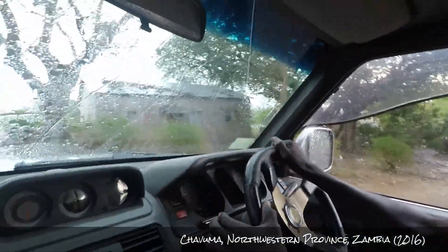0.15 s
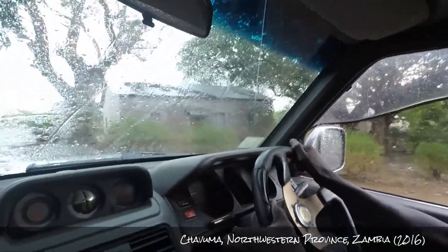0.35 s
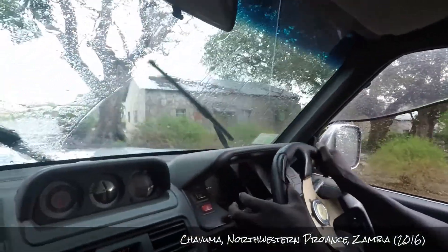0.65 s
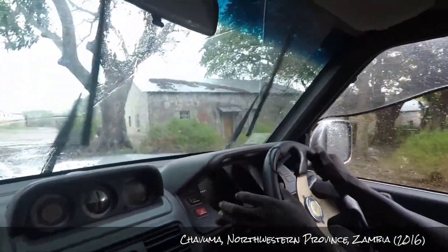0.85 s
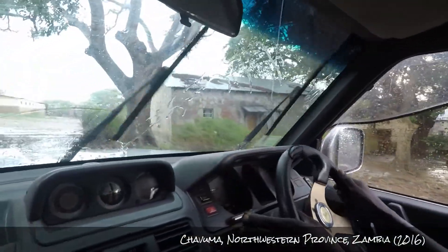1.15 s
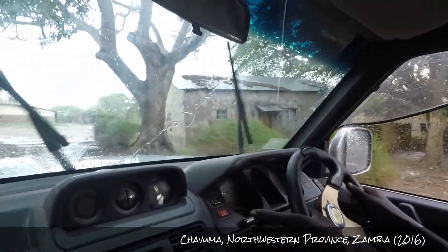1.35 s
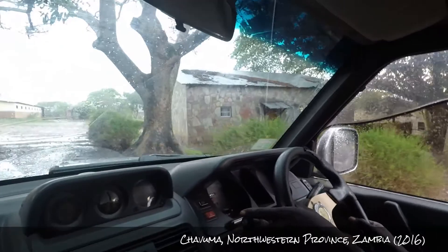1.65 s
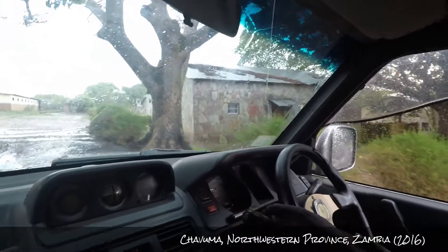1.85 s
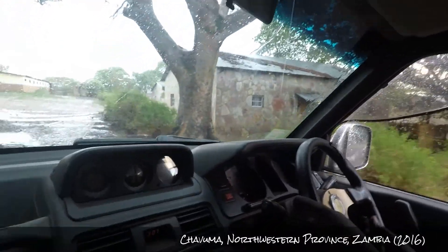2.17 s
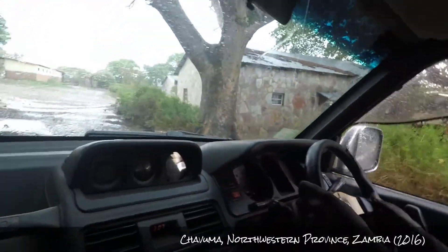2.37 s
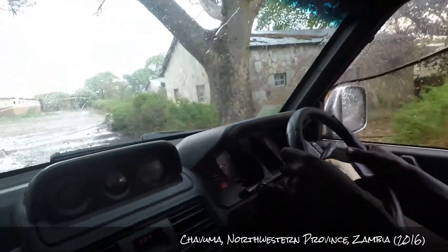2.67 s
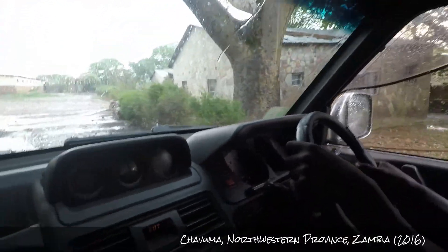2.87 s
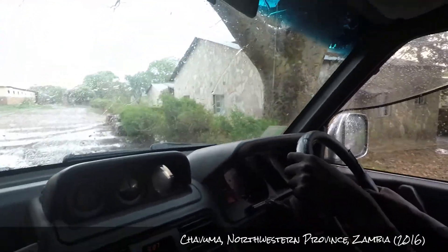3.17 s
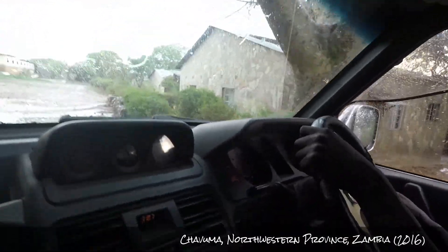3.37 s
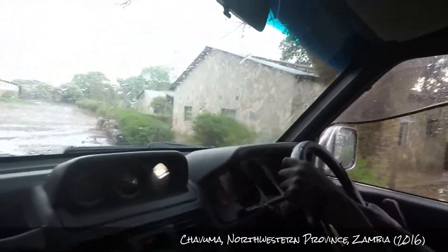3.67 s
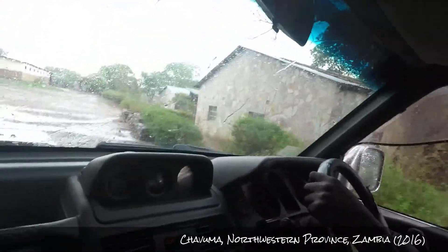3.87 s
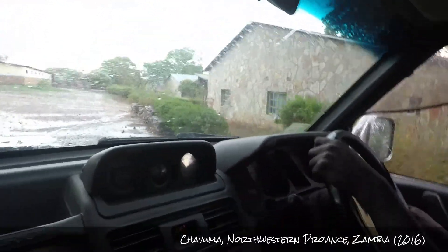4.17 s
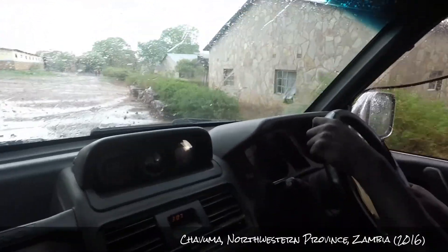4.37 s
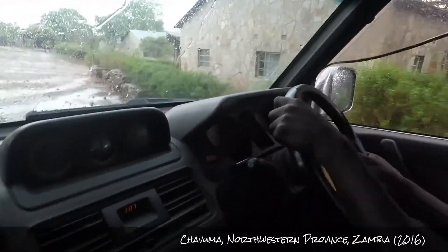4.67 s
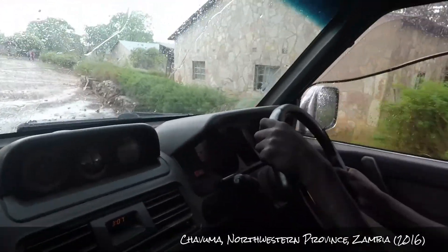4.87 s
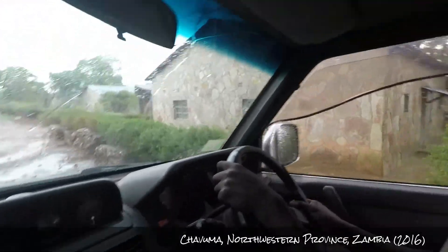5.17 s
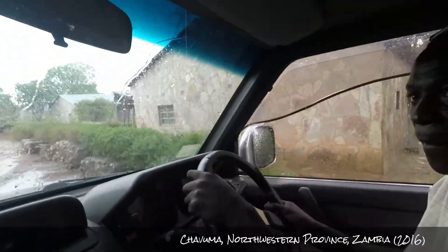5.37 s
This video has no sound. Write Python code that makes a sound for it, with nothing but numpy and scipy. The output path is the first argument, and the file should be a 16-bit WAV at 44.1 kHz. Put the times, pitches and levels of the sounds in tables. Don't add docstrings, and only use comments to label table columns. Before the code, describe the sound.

Rumbling car cabin with steady rain on roof and glass, small ticks and squeaks, a microphone thump, then muffled, softer sound.

```python
import sys
import numpy as np
from scipy import signal
from scipy.fft import rfft, irfft, next_fast_len
from scipy.io import wavfile
from scipy.ndimage import uniform_filter1d

SR = 44100
rng = np.random.default_rng(int(sys.argv[2]) if len(sys.argv) > 2 else 0)


def boost(x):
    u = np.asarray(x, float) / 20
    return 10 ** u


def materialize(psi):
    bounded = np.clip(np.atleast_2d(psi).T, -1, 1)
    quanta = np.round(bounded * 32767).astype(np.int16)
    wavfile.write(sys.argv[1], SR, quanta)


N = 243873
T = np.arange(N) / SR
SIZE = next_fast_len(N)
HZ = np.arange(SIZE // 2 + 1) * SR / SIZE
KNOCK_S = 3.7172

# f/Hz, level/dB per Hz
ROAD_COLOUR = [(8, -15.5), (14, -11), (25, 1), (45, -7), (62, -8), (90, -13), (130, -15), (190, -25),
               (260, -32.5), (500, -52), (900, -53)]
# t/s, peak level/dB, length/s
HEAVES = [(0.232, -11.5, 0.14), (0.488, -10.5, .2), (0.894, -12.5, 0.57), (1.122, -18, 0.22),
          (1.422, -16, .2), (1.643, -18, 0.13), (1.782, -12, 0.12), (1.979, -10, 0.091),
          (2.072, -13.5, .14), (2.412, -11, 0.27), (2.762, -19.5, 0.22), (3.082, -18.5, 0.18),
          (3.233, -12.5, 0.13), (3.399, -15, .16), (3.5, -5.5, 0.06), (3.702, -9, 0.092),
          (3.818, -4, 0.044), (4.004, -8, .1), (4.52, -13.5, 0.068), (4.691, -5, 0.069), (4.902, -17, 0.16),
          (5.093, -13, .4), (5.423, -15.5, .3)]
# t/s, peak level/dB, length/s
THUMPS = [(0.092, -21.5, 0.22), (0.364, -22.5, 0.11), (1.199, -19, .14), (1.523, -21.5, .1),
          (1.687, -25, .08), (2.07, -21, .2), (2.509, -19, .14), (2.797, -20.5, .1), (2.942, -18, 0.47),
          (3.173, -16, .12), (3.392, -21, 0.33), (3.562, -17, .1), (3.721, -21, .08), (4.029, -13, .04),
          (4.475, -22, 0.027), (4.703, -18, .12), (4.894, -20.5, .1), (5.3, -29.5, 0.3)]
# t/s, level/dB
RAIN_STRENGTH = [(0, 0), (.36, 0), (.64, 2), (.94, -1), (1.4, 0.5), (1.91, .5), (2.51, -1), (2.74, -3.5),
                 (2.86, 3.5), (3.36, 1.5), (3.71, -1), (4.2, -5.5), (4.6, -2.5), (4.85, -3), (5.1, -4.5),
                 (5.3, -4.5), (5.42, -0.5), (5.53, 1)]
# f/Hz, level/dB per Hz
RAIN_COLOUR = [(160, -22.5), (260, -2), (570, -7.5), (800, -11.5), (1250, -16), (1450, -13.5), (2400, -22),
               (4900, -28), (5800, -25), (7700, -36), (10000, -40), (11200, -45.5), (13300, -48),
               (15000, -67.5)]
# t/s, firing f/Hz, level/dB
ENGINE = [(0, 54.1, -18), (.5, 53.44, -14), (1.1, 53.67, -14.5), (1.65, 54.32, -18.5), (1.95, 52.82, -15),
          (2.2, 47.92, -13), (2.4, 43.3, -11.5), (2.5, 40.02, -19), (2.9, 37, -16), (3.2, 37.19, -20),
          (3.71, 37.5, -16.5), (4.2, 32, -14.5), (4.62, 30.78, -19.5), (4.72, 30.5, -16.5),
          (4.85, 28.8, -15), (4.98, 27.7, -13.5), (5.25, 29.65, -28.5), (5.53, 25, -12.5)]
# multiple of the firing rate, level/dB
ORDERS = [(1, 1.5), (2, -21.5), (3, -34), (4, -21.5)]
# t/s, peak level/dB, ring f/Hz, panel minus peak level/dB
RATTLES = [(0.11, -35, 1180, -14), (0.679, -29, 716, -6), (0.758, -35.5, 1391, -4),
           (1.212, -28.5, 1170, -5), (1.579, -27, 965, -12.5), (1.899, -35, 894, -7),
           (2.066, -28.5, 953, -7), (2.385, -28, 1164, -5.5), (2.422, -31, 735, -6.5),
           (2.5, -29.5, 880, -4.5), (2.824, -20, 865, -28), (2.901, -33.5, 980, 1),
           (2.95, -21.5, 955, -3.5), (3.006, -24, 810, -1.5), (3.119, -27, 750, 0.5),
           (3.175, -26, 980, -3.5), (3.222, -22, 880, -9), (3.283, -23, 960, -4), (3.336, -29.5, 930, 1),
           (3.363, -30.5, 1060, -4), (3.406, -30.5, 1040, -6.5), (3.443, -26, 720, -12),
           (3.805, -29.5, 1225, -2), (3.882, -35, 1240, 2), (4.713, -34.5, 808.3, -0.5),
           (4.856, -32.5, 713, -3), (4.898, -33, 750, 2), (5.104, -29.5, 890, -4), (5.19, -34.5, 799, 0),
           (5.513, -25, 1154, -11.5)]
# f/Hz, width/Hz, level/dB
TRIM = [
    (370, 350, -1),
    (1724, 1100, 2),
    (2950, 1300, -12.5),
    (5490, 820, 2),
]
# t/s, peak level/dB, ring f/Hz
TICKS = [(.033, -40, 5650), (.323, -43.5, 5430), (0.678, -36, 3500), (.758, -41, 5450),
         (1.337, -33.5, 5300), (1.388, -30.5, 5497), (2.949, -40, 5850), (3.006, -44, 5800),
         (3.119, -40, 5906), (3.363, -40, 6496), (3.756, -42, 5400), (4.303, -42, 5390), (4.596, -39, 5397),
         (4.754, -41, 2500), (4.994, -40.5, 3200), (5.362, -42, 5400), (5.407, -38, 5420)]
# t/s, length/s, f/Hz, level/dB, sag/Hz
SQUEAKS = [
    (1.88, .014, 4070, -46, 5),
    (1.895, 0.013, 4070, -48, 5),
    (2.307, 0.019, 4190, -44.5, 31),
    (2.874, .022, 4030, -43, -30),
    (2.899, 0.032, 4100, -43.5, 40),
    (3.508, 0.045, 4190, -35, 190),
    (3.772, 0.013, 4160, -43, 5),
    (4.623, 0.039, 4120, -39.5, 70),
    (4.782, 0.022, 4080, -43.5, 20),
    (5.05, .017, 4200, -48, 1),
]
# f/Hz, left level/dB, right level/dB, t60/s
HOUSING_MODES = [(1463, -15, -20.5, .05), (379, -18, 0, 0.014), (5850, -45, -17.5, 0.01),
                 (915, -46, -15, 0.019), (2580, -33, -24.5, 0.013), (7400, -49, -44, 0.0037)]
# t/s, length/s, level/dB, vent f/Hz
PUSH = [
    (3.7214, .0079, -1.0, 28.5),
    (3.7215, .0070, 3.5, 32.7),
]
# f/Hz, share 0-1
LIKENESS = [(60, 1.0), (120, 1), (240, 0.98), (470, 0.87), (930, 0.3), (1840, 0.42), (3650, 0.6),
            (5500, 0.67), (8000, 0.15)]
# f/Hz, left minus right level/dB
LEAN = [(60, 2.24), (150, 1.5), (300, 0.4), (510, -1), (900, 0), (1500, 1), (2500, 2), (4250, 1.9),
        (8000, 0.5)]
# f/Hz, phase/rad
LEAD = [(100, 0), (690, -.3), (1460, .8), (2070, .6), (2930, -.1), (4130, .2), (5510, 1.2), (6290, 2.0),
        (7410, 2.9)]


def curves(table):
    s, *columns = np.transpose(table)
    return [np.interp(T, s, column) for column in columns]


def over_hz(points):
    hz, value = np.transpose(points)
    return np.interp(np.log(HZ + 1), np.log(hz + 1), value)


def walk(rate):
    hold = int(SR / rate)
    steps = np.repeat(rng.standard_normal(N // hold + 1), hold)
    return 1.337 * uniform_filter1d(uniform_filter1d(steps, hold), hold)[:N]


def ring(x, hz, width_hz):
    return signal.lfilter(*signal.iirpeak(hz, hz / width_hz, fs=SR), x)


def swells(rest_db, events):
    power = boost(rest_db) ** 2
    for s, db, length in events:
        power = power + boost(db) ** 2 * np.cos(np.pi * np.clip((T - s) / length, -.5, .5)) ** 2
    return 10 * np.log10(power)


def panels(force, colour, low, high, flicker_db, flicker_rate):
    gain = boost(over_hz(colour))
    spectrum = rfft(force / np.std(force), SIZE) * gain
    lift = []
    for lo, hi, db in (low, high):
        band_power = np.sum(gain[(HZ > lo) & (HZ < hi)] ** 2) / len(HZ)
        lift.append(db - 10 * np.log10(band_power))
    octave, out = np.log2(HZ + 1), 0
    for centre in np.arange(np.log2(colour[0][0] + 1), np.log2(colour[-1][0]) + .5, .5):
        share = np.clip((centre - np.log2(low[1]) + 1) / (np.log2(high[0] / low[1]) + 2), 0, 1)
        band = np.cos(np.pi * np.clip(octave - centre, -.5, .5)) ** 2
        db = (1 - share) * lift[0] + share * lift[1] + flicker_db * walk(flicker_rate)
        out = out + boost(db) * irfft(spectrum * band, SIZE)[:, :N]
    return out


def road(boom_db=-22, rumble_db=-24):
    boom = (10, 36, swells(boom_db, HEAVES))
    rumble = (65, 300, swells(rumble_db, THUMPS))
    return panels(rng.standard_normal((2, N)), ROAD_COLOUR, boom, rumble, 0.82, 12)


def rain(drops_hz=900, big_hz=40, spread_db=3.5, roof_db=-37.5, glass_db=-44, glass_share=0.18):
    strength_db, = curves(RAIN_STRENGTH)
    size = boost(spread_db * np.minimum(rng.exponential(size=N), 2.4))
    luck = rng.random(N)
    small = signal.lfilter([1], [1, -np.exp(-1 / (0.0019 * SR))], size * (luck < drops_hz / SR))
    heavy = signal.lfilter([1], [1, -np.exp(-1 / (0.022 * SR))], size * (luck > 1 - big_hz / SR))
    heavy = uniform_filter1d(heavy, size=120)
    gusts = boost(0.88 * walk(18))
    force = gusts * (1 + 0.078 * small + 0.13 * heavy) * rng.standard_normal((2, N))
    roof = (400, 2000, roof_db + strength_db)
    glass = (2500, 7500, glass_db + glass_share * strength_db)
    return panels(force, RAIN_COLOUR, roof, glass, 0.79, 10)


def engine(pulling_hz=52.1, lift_hz=2.7, coast_db=-14):
    hz, db = curves(ENGINE)
    coast = np.clip((pulling_hz - hz) / lift_hz, 0, 1)
    slow = np.clip((44 - hz) / 4, 0, 1)
    hunt = 0.0043 * walk(6.12) + 0.117 * slow * walk(12)
    phase = 2 * np.pi * np.cumsum(hz * (1 + hunt)) / SR
    tone = 0
    for k, order_db in ORDERS:
        level_db = order_db + 1.74 * walk(11) + coast_db * coast * (k > 1)
        tone = tone + boost(level_db) * np.sin(k * phase + k)
    return np.sqrt(2) * boost(db - 1.5) * tone * np.ones((2, 1))


def trim_hits(rattle_t60=0.058, tick_t60=0.032, tick_under_panel_db=-11):
    hits = []
    for s, db, hz, panel_db in RATTLES:
        parts = [(hz, 0.59 * hz, 0)]
        offsets = [0, panel_db, panel_db, panel_db + tick_under_panel_db]
        for (f, width, level), offset in zip(TRIM, offsets):
            parts.append((f, width, level + offset))
        hits.append((s, db, rattle_t60, parts))
    for s, db, hz in TICKS:
        hits.append((s, db, tick_t60, [(hz, 1000, 2), (1500, 1400, -9)]))
    return hits


def rattles(rise_s=0.0021, chatter_s=0.006, soft_from_s=4.65, soft_rise_s=0.0028, soft_t60=.1):
    out, t = np.zeros((2, N + 4096)), T[:4096]
    contact = 0.73 * np.sin(np.pi * np.clip(t / .0003, 0, 1))
    for s, db, t60, parts in trim_hits():
        soft = s > soft_from_s
        rise, t60 = (soft_rise_s, soft_t60) if soft else (rise_s, t60)
        decay = boost(-60 * np.maximum(t - chatter_s, 0) / t60)
        chatter = (1 - np.exp(-t / rise)) * decay * rng.standard_normal((2, len(t)))
        force = contact * (not soft) + chatter
        start = int((s + .0005) * SR)
        for hz, width, level in parts:
            sound = ring(ring(force, hz, width), hz, width)
            sound = sound / np.max(np.abs(sound), axis=1, keepdims=True)
            out[:, start:start + len(t)] += boost(db + level + 3) * sound
    return out[:, :N]


def squeaks(third_db=-34, edge_s=0.0026, waver_hz=25, flutter_db=2.0, pan_db=-5.5):
    out, waver, flutter = np.zeros((2, N)), waver_hz * walk(150), flutter_db * walk(200)
    pan = pan_db * np.array([[.5], [-.5]])
    for s, length, hz, db, sag_hz in SQUEAKS:
        i = np.arange(int(s * SR), int((s + length) * SR))
        t = T[i] - s
        phase = 2 * np.pi * np.cumsum(hz - sag_hz * (t / length) ** 2 + waver[i]) / SR
        edge = np.clip(np.minimum(t, length - t) / edge_s, 0, 1)
        swell_db = np.interp(t / length, [0, 0.3, 1], [-4, 0, -5.5]) + flutter[i]
        whistle = np.sin(phase) + boost(third_db) * np.sin(3 * phase)
        out[:, i] = np.sqrt(2) * edge * boost(db + swell_db + pan) * whistle
    return out


def knock(touch_s=.0054, crack_db=-22, crack_t60=0.0051):
    t = np.maximum(T - KNOCK_S, 0)
    fall_db = -60 * np.minimum(t, 1)
    struck = np.clip(t / 0.00048, 0, 1) * np.clip((touch_s - t) / 0.00061, 0, 1)
    out = ring(rng.standard_normal((2, N)), 1500, 2500) * boost(crack_db + fall_db / crack_t60)
    for k, (hz, left_db, right_db, t60) in enumerate(HOUSING_MODES):
        level = boost(np.array([[left_db], [right_db]]) + fall_db / t60)
        out = out + (-1) ** (k + 1) * level * np.sin(2 * np.pi * hz * t)
    out = out * struck
    for port, (s, length, db, vent_hz) in enumerate(PUSH):
        push = boost(db) * np.sin(np.pi * np.clip((T - s) / length, 0, 1)) ** 2
        push = signal.lfilter(*signal.butter(1, 400, fs=SR), push)
        out[port] += signal.lfilter(*signal.butter(2, vent_hz, "high", fs=SR), push)
    return out


def ports(pair):
    a, b = rfft(pair, SIZE)
    like = np.clip(over_hz(LIKENESS), 0, 1)
    right = like * a * np.exp(-1j * over_hz(LEAD)) + np.sqrt(1 - like ** 2) * b
    lean = boost(over_hz(LEAN) / 2)
    return irfft(np.array([a * lean, right / lean]), SIZE)[:, :N]


def diaphragm_bass(lost_db=-18, back_s=0.18):
    since = T - KNOCK_S
    return boost(lost_db * np.clip(since * 500, 0, 1) * np.exp(-np.maximum(since, 0) / back_s))


def gain_control(duck_db=-30, duck_back_s=.036, step_db=-5, drop_db=-11.5, sink_s=0.13, hold_s=.5,
                 recover_db_per_s=11.5):
    since = np.maximum(T - KNOCK_S, 0)
    shut = np.clip(since / .002, 0, 1)
    duck = duck_db * np.clip(1 - since / duck_back_s, 0, 1)
    sunk = drop_db + (step_db - drop_db) * np.exp(-since / sink_s)
    sunk = sunk + recover_db_per_s * np.maximum(since - hold_s, 0)
    return boost(shut * (duck + np.minimum(sunk, 0)))


def limiter(x, ceiling=0.67):
    peak = np.max(np.abs(x), axis=0) + 1e-9
    return x * ceiling * np.tanh((peak / ceiling) ** 2) ** .5 / peak


def scene():
    body = (engine() + road()) * diaphragm_bass()
    cabin = ports(body + rain() + rattles()) + squeaks()
    return limiter(cabin * gain_control()) + knock()


def low_pass(x):
    return signal.sosfilt(signal.butter(12, 15700, fs=SR, output="sos"), x)


def record(dry, shelf_hz=7820, shelf_db=-5.5):
    shelf = boost(shelf_db * np.clip((HZ - shelf_hz) / 100 + .5, 0, 1))
    mix = np.clip(irfft(rfft(dry, SIZE) * shelf, SIZE)[:, :N], -.95, .95)
    return low_pass(mix)


dry = scene()
out = record(dry)
materialize(out)
```